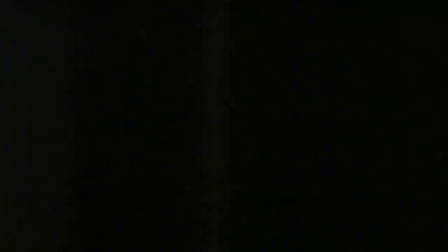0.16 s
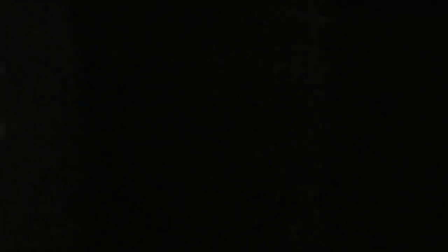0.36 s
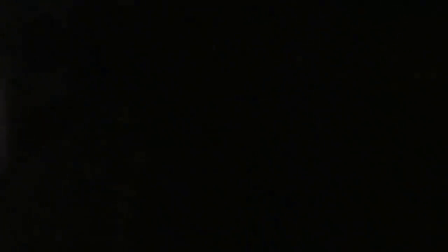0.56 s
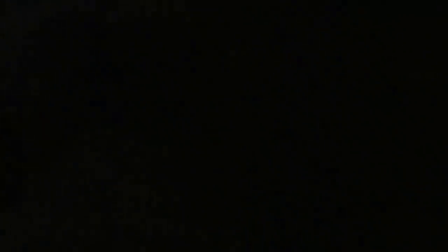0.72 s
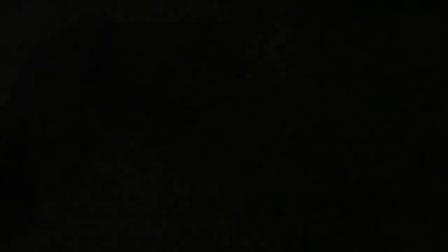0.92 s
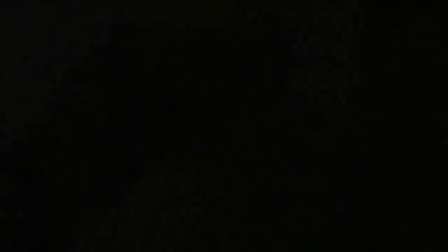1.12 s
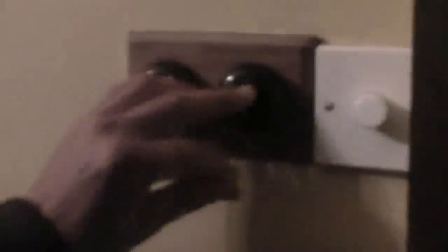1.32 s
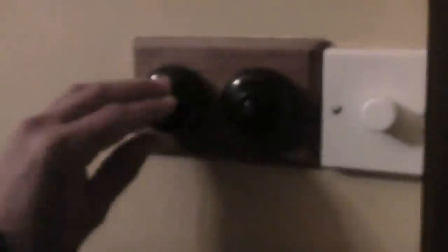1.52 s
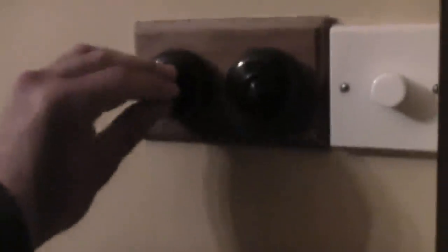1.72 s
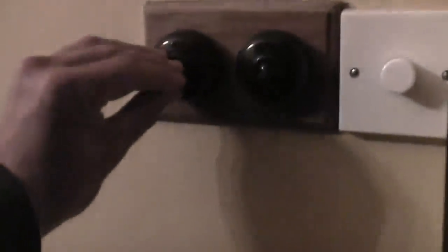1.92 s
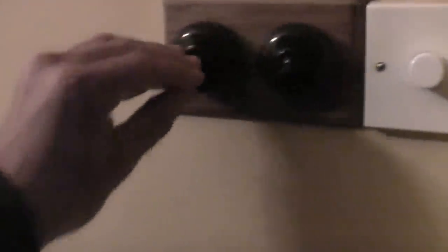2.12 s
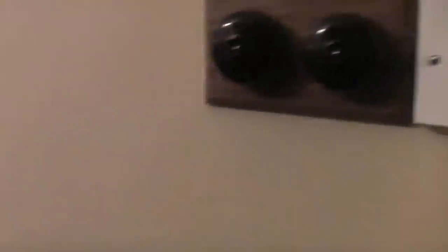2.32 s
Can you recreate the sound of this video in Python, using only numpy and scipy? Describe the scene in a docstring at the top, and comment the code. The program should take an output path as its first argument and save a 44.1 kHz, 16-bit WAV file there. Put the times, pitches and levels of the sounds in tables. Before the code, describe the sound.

Sharp clicks of an old light switch with soft sleeve rustling and a short echo.

```python
"""A quiet, echoing hall, heard in stereo from close to an old round toggle switch on the wall.
Someone steps up: clothes rustle, a first snap sounds, feet bump, a sleeve sweeps, wood knocks and creaks.
The spring toggle snaps on, then off, ringing its housing; a faint high whistle comes and goes.
The recorder's limiter ducks at each loud snap, so the echo of the hall swells up just after it."""
import sys
import numpy as np
from scipy import signal
from scipy.fft import rfft, irfft
from scipy.io import wavfile
from scipy.ndimage import uniform_filter1d, minimum_filter1d

SR = 44100
rng = np.random.default_rng(int(sys.argv[2]) if len(sys.argv) > 2 else 0)


def to_wav(sig):
    """Store sig (one row per channel, or 1-D mono) as 16-bit WAV at the path in sys.argv[1].

    Samples outside -1..1 are clipped; the rate is SR.
    """
    pcm = np.clip(np.atleast_2d(sig), -1, 1) * 32767
    pcm = np.round(pcm).astype(np.int16)
    wavfile.write(sys.argv[1], SR, pcm.T)  # frames by channels


N = 104296

# how alike the left and right microphones hear diffuse sound: frequency_hz, correlation
MIC_LIKENESS = [(30, 0.42), (130, 0.9), (400, 0.73), (1000, 0.58), (4000, 0.67), (16000, 0.51)]
# room tone of the building: frequency_hz, level_db
ROOM_COLOUR = [(20, -23), (50, -0.5), (100, -7.5), (165, 0.5), (300, -6.5), (2000, -14), (4000, -22),
               (16000, -36)]
# clothes rustling on the way to the wall: time_s, level_db
RUSTLE_CURVE = [(0, -40.5), (.12, -43), (.35, -51), (.5, -52.5), (.535, -46.5), (.62, -49.5), (.8, -44.5),
                (1.1, -78)]
# spectrum of the rustle: frequency_hz, level_db
RUSTLE_COLOUR = [(100, -11), (650, 3), (1300, -6), (2200, -13.5), (4100, 2), (5800, -6.5), (8500, -7.5),
                 (10500, -11.5), (16000, -26.5)]
# low rumble of the movement: time_s, level_db
RUMBLE_CURVE = [(0, -55.5), (.35, -55.5), (.44, -35), (.52, -45.5), (.6, -48.5), (1.0, -70), (1.2, -61.5),
                (1.3, -81)]
# spectrum of the rumble: frequency_hz, level_db
RUMBLE_COLOUR = [(30, -33), (70, -13), (140, 1), (400, -3.5), (700, -8.5), (8000, -59)]
# cloth sliding, loudest just after the first snap: time_s, level_db
SLIDE_CURVE = [(0, -65), (.06, -53), (.11, -44), (.17, -40), (.27, -41.5), (.35, -50), (.48, -54),
               (.56, -86)]
# spectrum of the slide: frequency_hz, level_db
SLIDE_COLOUR = [(150, -19.5), (750, -7), (1100, -12), (1750, 2), (2600, -6.5), (4400, -5), (5600, -13.5),
                (16000, -25)]
# resonances of the slide: centre_hz, width_hz, lift_db
SLIDE_PEAKS = [(3420, 220, 7), (4200, 180, 10.5)]
# dull bumps of feet and woodwork: start_s, level_db, tilt_db_per_octave
BUMPS = [(.035, -42.5, -4.5), (.109, -42.5, 5.5), (0.145, -42.5, 5), (.364, -28.5, 1), (0.4206, -24.5, -1),
         (0.4568, -27, -2), (.485, -38, -7), (1.360, -39, 4)]
# ringing of the woodwork: pitch_hz, level_db, t60_s
WOOD_MODES = [(126.3, -7.5, 0.15), (164, -5.5, 0.13), (174.4, -6.5, 0.12), (273.7, -9.5, 0.15),
              (382.3, -7.5, 0.15), (476, -3.5, 0.036), (618, -1.5, 0.036), (846, -8, 0.029),
              (1049, -4.5, 0.039), (1293, -14.5, 0.048), (1650, -11.5, 0.078)]
# spectrum of the hall's echo: frequency_hz, level_db
HALL_COLOUR = [(40, -29), (110, -16.5), (290, -0.5), (580, -11.5), (1100, -5.5), (2100, -8), (3400, -2),
               (4200, 5), (5000, 0.5), (6600, 1), (8800, -3), (11000, -8), (16000, -18)]
# reverberation time of the hall: frequency_hz, t60_s
HALL_DECAY = [(150, 0.59), (4200, 0.67), (7000, 0.56), (10000, 0.45), (16000, 0.35)]
# blows of the spring toggle: start_s, level_db, kind
SNAPS = [(0.0701, 0, "first"), (0.0725, -16.5, "first"), (1.184, -29.5, "on"), (1.2963, 13, "on"),
         (1.7610, -30, "on"), (1.9659, -10.5, "off"), (1.9672, 12.5, "off")]
# ringing of the switch at the first snap, going on and going off: pitch_hz, level_db, t60_s
FIRST_MODES = [(2660, -19.5, 0.0063), (3460, -4.5, 0.002), (4780, -1.3, 0.0036), (7070, -16, 0.0034)]
ON_MODES = [(1450, -20, 0.0066), (2850, -9.5, 0.0035), (4070, -11, 0.01), (4640, -17, 0.012),
            (6600, -13.5, 0.0097), (8600, -19, 0.015), (10100, -16.5, 0.0031), (13700, -19, .003)]
OFF_MODES = [(347, -46, 0.07), (1247, -15.5, 0.0065), (2830, -12, 0.0051), (3620, -8.5, 0.01),
             (4370, -13, 0.011), (5100, -12.5, 0.0055), (6500, -5.5, 0.005), (8800, -22.5, 0.0065),
             (11270, -16, 0.0045), (14550, -25, 0.0033)]
# each kind of snap and the band it sends into the hall: modes, left_db, push_db, low_hz, high_hz
SNAP_KINDS = {"first": (FIRST_MODES, 3.7, -50, 1000, 10000), "on": (ON_MODES, -0.46, -24.5, 200, 19400),
              "off": (OFF_MODES, -0.25, -39, 160, 11700)}
# tones each kind of snap throws into the hall: centre_hz, lift_db
THROWN_TONES = {"first": [(8900, 8.5)], "on": [(1400, 5), (6900, 2.5), (8800, 7.5)], "off": [(370, 3.5),
                (4050, 4), (6350, 3.5)]}
# sleeve sweeping up to the switch: time_s, level_db
SLEEVE_CURVE = [(.5, -51.5), (.54, -45), (.65, -47), (.71, -39), (.765, -33), (.85, -32), (.92, -39),
                (1.0, -45.5), (1.3, -65.5)]
# spectrum of the sleeve: frequency_hz, level_db
SLEEVE_COLOUR = [(180, -29.5), (600, -16.5), (1250, -7.5), (1850, -3), (2900, -2.5), (3700, -10),
                 (6000, -17.5), (9000, -19.5), (16000, -40.5)]
# resonances of the sleeve: centre_hz, width_hz, lift_db
SLEEVE_PEAKS = [(982, 54, 4), (1483, 24, 10), (1862, 45, 11.5), (2010, 27, 0)]
# short hollow knocks and a creak of wood: start_s, level_db, pitch_hz, decay_s
WOOD_NOTES = [(.600, -31.5, 880, 0.021), (.742, -30, 992, 0.011), (1.361, -31.5, 221, 0.0068)]
# faint high whistles: start_s, length_s, level_db, top_pitch_hz
WHISTLES = [(1.033, 0.33, -56, 2530), (1.575, 0.37, -53.5, 2517), (2.25, 0.42, -52.5, 2453)]

BAND_LIMIT_HZ = 16100


def amp(db):
    """Decibels to gain."""
    return 10 ** (np.asarray(db) / 20)


def pan(left_db):
    """Stereo gains: the left goes up by left_db, the right down by as much."""
    return amp([[left_db], [-left_db]])


def unit(x):
    """Scales to an rms of one."""
    return x / np.sqrt(np.mean(x ** 2) + 1e-20)


def at_hz(table, hz):
    """Reads a table on a log-frequency axis."""
    table_hz, value = np.transpose(table)
    return np.interp(np.log(hz + 1), np.log(table_hz + 1), value)


def fader(curve):
    """Gain along a curve of time_s, level_db."""
    return amp(np.interp(np.arange(N) / SR, *np.transpose(curve)))


def add(mix, start_s, sound):
    """Mixes a sound in at a time."""
    part = mix[round(start_s * SR):][:len(sound)]
    part += sound[:len(part)]


def mic_pair(spectra, hz):
    """Turns two unrelated spectra into a partly alike left and right."""
    likeness = at_hz(MIC_LIKENESS, hz)
    mid = np.sqrt((1 + likeness) / 2) * spectra[0]
    side = np.sqrt((1 - likeness) / 2) * spectra[1]
    return np.array([mid + side, mid - side])


def noise(colour, grain_db=0):
    """Coloured stereo noise; grain_db roughens it into tiny grains."""
    hz = np.fft.rfftfreq(N, 1 / SR)
    grains = amp(grain_db * unit(uniform_filter1d(rng.standard_normal(N), size=60)))
    spectra = mic_pair(rfft(rng.standard_normal((2, N)) * grains), hz)
    return unit(irfft(spectra * amp(at_hz(colour, hz)), N))


def resonance(x, hz, width_hz, lift_db):
    """What a steady or gliding resonance adds to a sound."""
    carrier = np.exp(2j * np.pi * np.cumsum(hz * np.ones(x.shape[-1])) / SR)
    pole = np.exp(-np.pi * width_hz / SR)
    band = carrier * signal.lfilter([1 - pole], [1, -pole], x / carrier + 1e-18)
    return (amp(lift_db) - 1) * 2 * band.real


def ring(modes, t, tilt_db=0, detune=0):
    """Dying sines of a struck body, alternating in sign, tilted by tilt_db an octave about 400 Hz."""
    shift = 1 + detune * rng.standard_normal(len(modes))
    out = np.zeros(len(t))
    for k, (hz, db, t60_s) in enumerate(modes):
        envelope = amp(db + tilt_db * np.log2(hz / 400) - 60 * t / t60_s)
        out += (-1) ** k * envelope * np.sin(2 * np.pi * hz * shift[k] * t)
    return out


def wobble(size, width_hz):
    """Complex flutter that spreads a tone over a width."""
    hz = np.fft.fftfreq(size, 1 / SR)
    white = rng.standard_normal(size) + 1j * rng.standard_normal(size)
    flutter = np.fft.ifft(np.fft.fft(white) / (1 + (2 * hz / width_hz) ** 4))
    return flutter / np.sqrt(np.mean(abs(flutter) ** 2))


def room_tone(level_db=-58.5):
    """The steady hush of the building, all around the microphones."""
    return amp(level_db) * noise(ROOM_COLOUR)


def clothes():
    """Cloth rustles over a low rumble as the body moves, close and dry."""
    rustle = fader(RUSTLE_CURVE) * noise(RUSTLE_COLOUR, grain_db=1.3)
    return rustle + fader(RUMBLE_CURVE) * noise(RUMBLE_COLOUR)


def slide(hiss_start_hz=9130, sag_hz_per_s=4700):
    """Cloth slides, singing more as it rubs harder, while one high resonance sinks."""
    scrape, pressure = noise(SLIDE_COLOUR), fader(SLIDE_CURVE)
    body = sum(resonance(scrape, *peak) for peak in SLIDE_PEAKS)
    hiss_hz = np.maximum(hiss_start_hz - sag_hz_per_s * np.arange(N) / SR, 0)
    hiss = resonance(scrape, hiss_hz, width_hz=370, lift_db=13)
    return pressure * (scrape + pressure / pressure.max() * (body + hiss))


def bumps(scuff_db=-12.5, scuff_s=0.014):
    """Soft blows scuff the woodwork and set it ringing; brighter ones scuff more."""
    out, t = np.zeros(N), np.arange(SR // 2) / SR
    scuff_band = signal.butter(3, [75, 1150], "band", fs=SR, output="sos")
    for start_s, db, tilt_db in BUMPS:
        scuff = unit(signal.sosfilt(scuff_band, rng.standard_normal(len(t)))) * np.exp(-t / scuff_s)
        wood = ring(WOOD_MODES, t, tilt_db, detune=0.043)
        add(out, start_s, amp(db) * (wood + amp(scuff_db + tilt_db) * scuff))
    return out


def hall(x, early_db=3.5, early_s=0.011):
    """Dense reflections, the treble dying first, a little stronger from the nearest walls."""
    hz, t, spectra = signal.stft(rng.standard_normal((2, SR)), SR, nperseg=256)
    decay = amp(-60 * t / at_hz(HALL_DECAY, hz[:, None]))
    tail = signal.istft(mic_pair(spectra, hz[:, None]) * decay, SR, nperseg=256)[1]
    t, hz = np.arange(tail.shape[1]) / SR, np.fft.rfftfreq(tail.shape[1], 1 / SR)
    tail = irfft(rfft(tail) * amp(at_hz(HALL_COLOUR, hz)), len(t))
    tail *= (1 + amp(early_db) * np.exp(-t / early_s)) * (t > .002) * (t < .9)
    return signal.fftconvolve(x[None], tail / np.linalg.norm(tail[0]), axes=1)[:, :N]


def switch(crack_db=-16.5, crack_s=0.0011, push_s=0.00079, wall_s=.0082, wall_db=-23, hall_db=-1.05):
    """Each blow of the toggle is a crack, a low push and a short ring of the housing; the hall answers."""
    direct, blows, t = np.zeros((2, N)), np.zeros(N), np.arange(3000) / SR
    low_cut = signal.butter(2, 254, "high", fs=SR, output="sos")
    for start_s, db, kind in SNAPS:
        modes, left_db, push_db, low_hz, high_hz = SNAP_KINDS[kind]
        grit = uniform_filter1d(rng.standard_normal(len(t)), size=2)
        crack = amp(crack_db) * np.exp(-t / crack_s) * grit
        push = amp(push_db) * (1 - t / push_s) * np.exp(-t / push_s)
        snap = signal.sosfilt(low_cut, ring(modes, t) + crack) + push
        add(direct[0], start_s, amp(db + left_db) * snap)
        add(direct[1], start_s, amp(db - left_db) * snap)
        # the hall is set off by a band-limited click with a few tones lifted
        band = signal.butter(1, [low_hz, min(high_hz, BAND_LIMIT_HZ)], "band", fs=SR, output="sos")
        blow = amp(db) * signal.sosfilt(band, signal.unit_impulse(len(t)))
        tones = sum(resonance(blow, hz, width_hz=345, lift_db=lift) for hz, lift in THROWN_TONES[kind])
        add(blows, start_s, blow + tones)
    wall_echo = np.pad(direct, ((0, 0), (round(wall_s * SR), 0)))[:, :N]
    return direct + amp(wall_db) * wall_echo + amp(hall_db) * hall(blows)


def sleeve():
    """The sleeve swishes as the arm comes up; the harder it rubs, the more it sings."""
    rub, pressure = noise(SLEEVE_COLOUR, grain_db=1), fader(SLEEVE_CURVE)
    singing = sum(resonance(rub, *peak) for peak in SLEEVE_PEAKS)
    return pressure * (rub + pressure / pressure.max() * singing)


def wood_notes(attack_s=0.0061):
    """Short hollow knocks and a creak of wood, each two rough partials dying fast."""
    out, t = np.zeros(N), np.arange(SR // 2) / SR
    for start_s, db, hz, decay_s in WOOD_NOTES:
        tone = np.sin(2 * np.pi * hz * t) + 0.22 * np.sin(2 * np.pi * 1.6 * hz * t)
        roughness = 1 + wobble(len(t), width_hz=590).real
        envelope = np.minimum(t / attack_s, 1) * np.exp(-t / decay_s)
        add(out, start_s, amp(db) * tone * roughness * envelope)
    return out


def whistle(bend=0.0354, skew=0.708):
    """A faint fuzzy tone whose pitch and level rise and fall together."""
    out, t = np.zeros(N), np.arange(SR // 2) / SR
    for start_s, length_s, db, top_hz in WHISTLES:
        arch = np.sin(np.pi * np.minimum(t / length_s, 1) ** skew)
        cycles = np.cumsum(top_hz * (1 - bend * (1 - arch))) / SR
        tone = (wobble(len(t), width_hz=166) * np.exp(2j * np.pi * cycles)).real
        add(out, start_s, amp(db) * arch * unit(tone))
    return out


def scene():
    """At the microphones: switch and woodwork with their echo, dry cloth, whistle and room tone."""
    snaps = switch()
    wood = bumps() + wood_notes()
    wood_in_hall = (wood + amp(-1) * hall(wood)) * pan(left_db=-.8)
    cloth = sleeve() * pan(left_db=-1.1) + slide() * pan(left_db=2) + clothes()
    return snaps + wood_in_hall + cloth + whistle() * pan(left_db=-2) + room_tone()


def record(dry, limit_db=-12, hold_s=0.038, release_db_per_s=405, ceiling=.85):
    """The recorder's limiter ducks at once, holds and recovers; then soft overload and the band limit."""
    power_db = 10 * np.log10(abs(uniform_filter1d((dry ** 2).mean(0), size=66)) + 1e-12)
    over_db = np.maximum(power_db - limit_db, 0)
    hold = 2 * int(hold_s * SR / 2) + 1
    held_db = -minimum_filter1d(-over_db, hold, origin=hold // 2)  # highest over the last hold_s
    release_db = np.arange(N) * release_db_per_s / SR
    duck_db = uniform_filter1d(np.maximum.accumulate(held_db + release_db) - release_db, size=30)
    out = ceiling * np.tanh(dry * amp(-duck_db) / ceiling)
    high_cut = signal.firwin(255, BAND_LIMIT_HZ, window=("kaiser", 8), fs=SR)
    return signal.oaconvolve(out, high_cut[None], "same")


dry = scene()
out = record(dry)
to_wav(out)
```